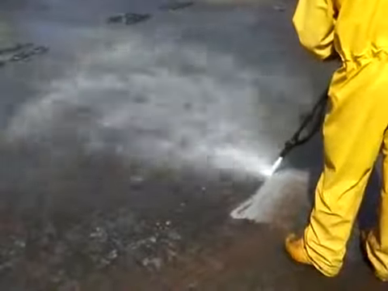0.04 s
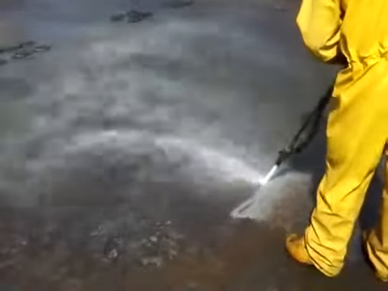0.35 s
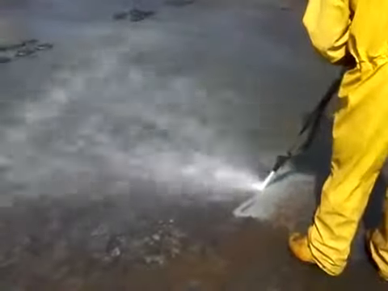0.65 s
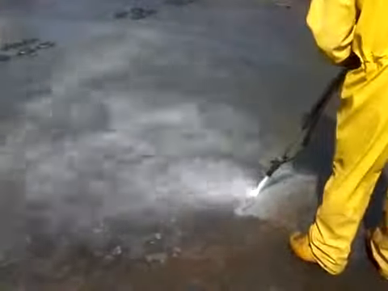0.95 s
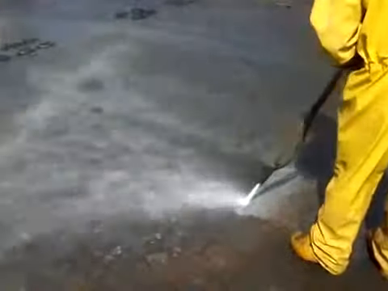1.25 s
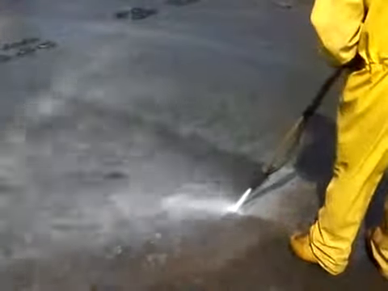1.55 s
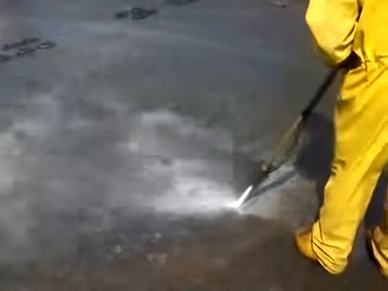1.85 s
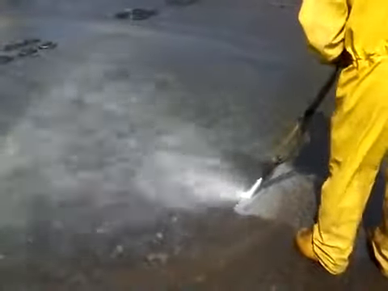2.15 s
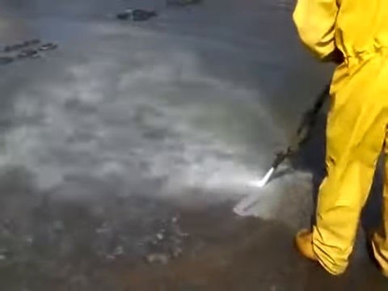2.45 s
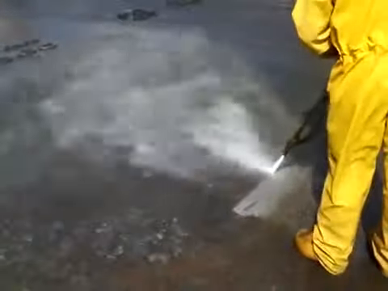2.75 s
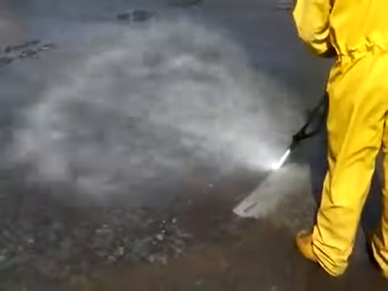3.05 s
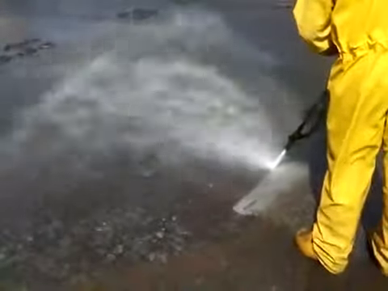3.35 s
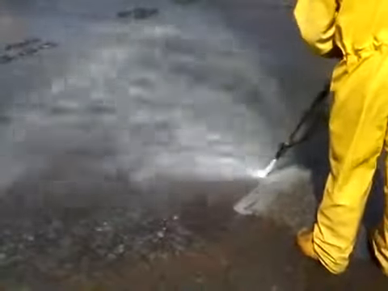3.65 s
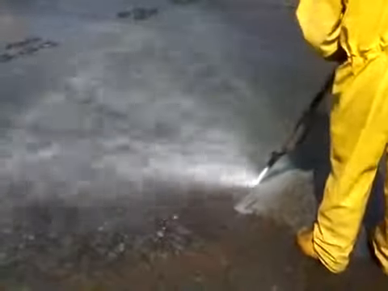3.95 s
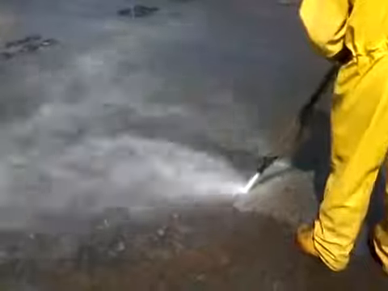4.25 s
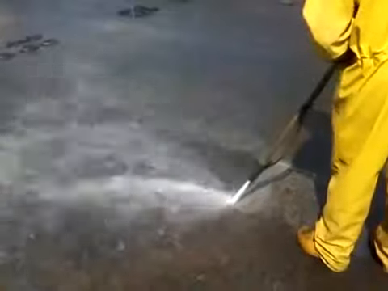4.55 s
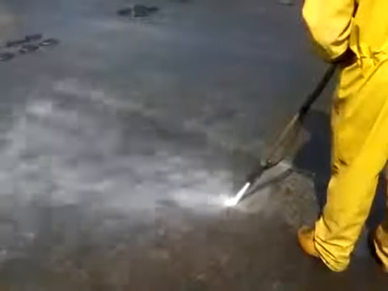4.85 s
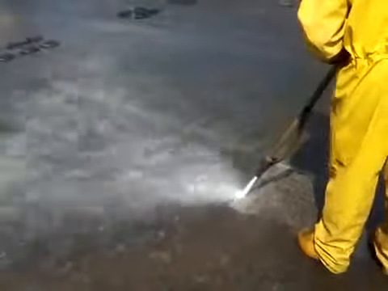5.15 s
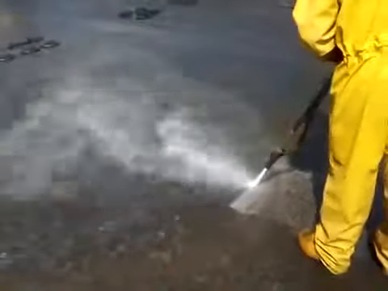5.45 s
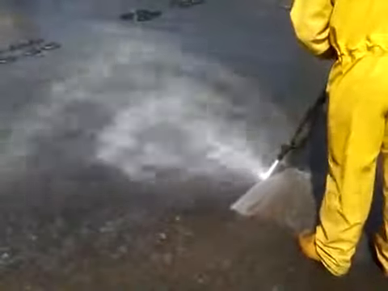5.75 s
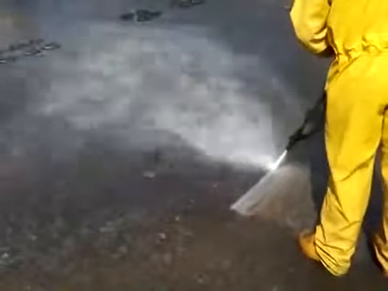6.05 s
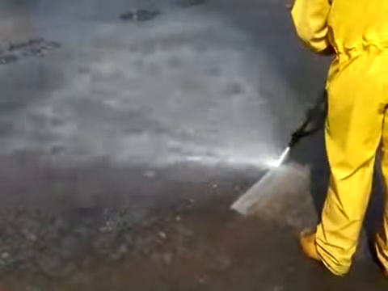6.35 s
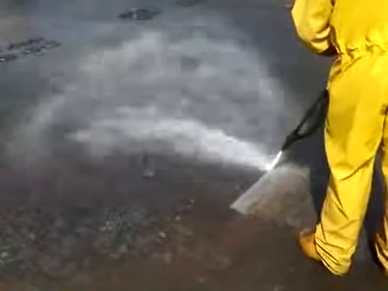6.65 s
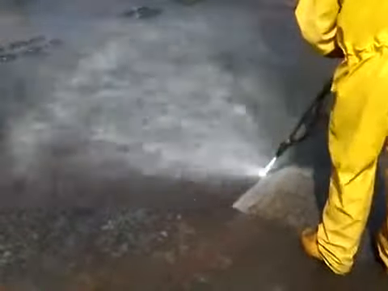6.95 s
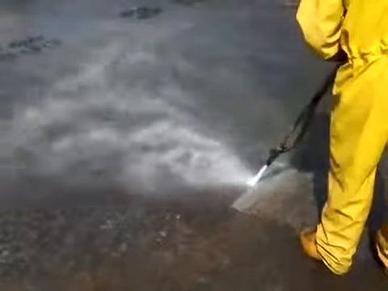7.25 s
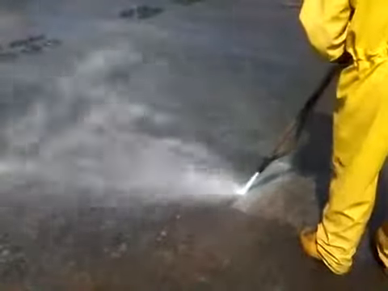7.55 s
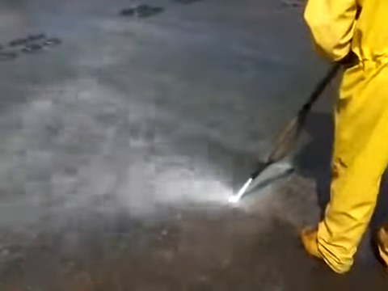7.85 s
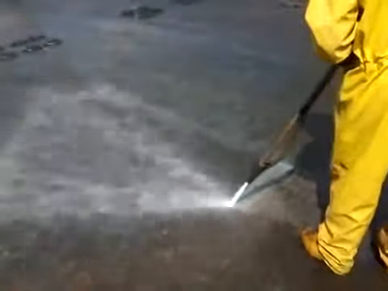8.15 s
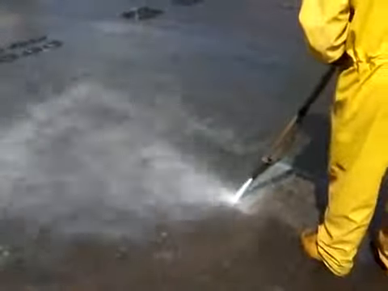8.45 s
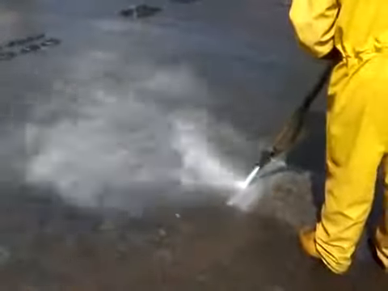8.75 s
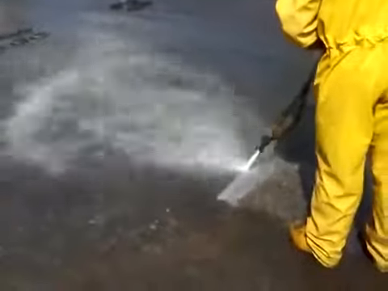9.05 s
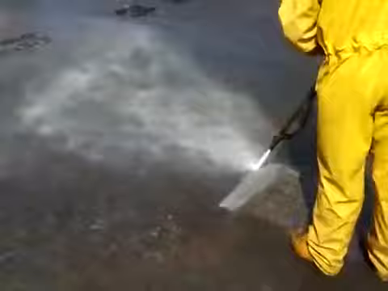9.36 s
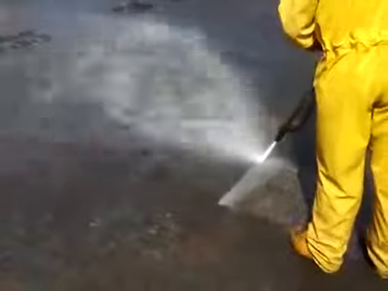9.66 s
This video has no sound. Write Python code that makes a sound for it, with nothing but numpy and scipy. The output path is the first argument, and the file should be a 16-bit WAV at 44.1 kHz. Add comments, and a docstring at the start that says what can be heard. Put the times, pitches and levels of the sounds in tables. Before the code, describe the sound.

A high-pressure jet of water and grit hisses loudly and without pause against flat ground outdoors. The bright hiss sputters slightly over a softer splashing wash, and its tone glides as the lance swings out and back about every three seconds. A few brief spits of grit break through. Underneath, a distant pump engine hums faintly and a light breeze rumbles on the microphone.

```python
"""Wet blasting outdoors

A worker sweeps a lance to and fro over flat ground; its sputtering jet of water and grit hisses.
Close reflections comb the hiss, and their notches glide as the lance swings out and back.
A pump engine hums far off and a breeze rumbles on the microphone. Mono, sampled at 16 kHz."""
import sys
import numpy as np
from scipy import signal
from scipy.fft import rfft, irfft, next_fast_len
from scipy.io import wavfile
from scipy.ndimage import uniform_filter1d, map_coordinates

SR = 44100
rng = np.random.default_rng(int(sys.argv[2]) if len(sys.argv) > 2 else 0)


def store_pcm(level_fs):
    """Save levels as 16-bit WAV."""
    pcm = np.round(np.clip(level_fs, -1, 1) * 32767).astype(np.int16)
    wavfile.write(sys.argv[1], SR, np.atleast_2d(pcm).T)


N = 432180
TIME_S = np.arange(N) / SR
SAMPLER_HZ = 16000


def amp(db):
    """Decibels to gain."""
    return 10 ** (np.asarray(db) / 20)


def unit_rms(x):
    """Scale to rms 1."""
    return x / np.sqrt(np.mean(x ** 2) + 1e-20)


def curve(rows):
    """One value per sample from (seconds, value) rows."""
    return np.interp(TIME_S, *np.transpose(rows))


def swells(rows):
    """Envelope of bell-shaped swells."""
    return sum(amp(db) * np.exp(-((TIME_S - peak_s) / width_s) ** 2) for peak_s, db, width_s in rows)


def wobble(rate_hz):
    """Smooth random curve, rate_hz knots a second."""
    knots = rng.standard_normal(int(N * rate_hz / SR) + 4)
    return map_coordinates(knots, [TIME_S * rate_hz])


def filtered(x, response):
    """Apply a gain given as a function of Hz."""
    size = next_fast_len(N + SR // 2)
    return irfft(rfft(x, size) * response(np.fft.rfftfreq(size, 1 / SR)), size)[:N]


def coloured(x, spectrum):
    """Shape x by (Hz, dB) rows, cut at half of SAMPLER_HZ; rms 1."""
    hz, db = np.transpose(spectrum)
    shaped = filtered(x, lambda f: amp(np.interp(np.log(f + 1), np.log(hz), db)) * (f < SAMPLER_HZ / 2))
    return unit_rms(shaped)


def turbulence(patchy_db):
    """White noise with brief random patches of gain in time and frequency; rms 1."""
    bins = signal.stft(rng.standard_normal(N), nperseg=256)[2]
    patches = uniform_filter1d(rng.standard_normal(bins.shape), size=9, axis=0)
    patches = unit_rms(uniform_filter1d(patches, size=12, axis=1))
    return unit_rms(signal.istft(bins * amp(patchy_db * patches), nperseg=256)[1][:N])


def impacts(per_s, spread_db):
    """Tiny impacts of uneven size at random moments; rms 1."""
    hits = rng.random(N) < per_s / SR
    return unit_rms(hits * rng.choice([-1, 1], N) * amp(spread_db * rng.standard_normal(N)))


# Wind rumble. Each row: time in seconds, level in dB.
RUMBLE_LEVELS = [(0, -42.7), (2.2, -43), (3, -45), (3.9, -44), (4.4, -39.8), (5.3, -41.8), (6.9, -42.2),
                 (9.3, -45), (9.8, -41.5)]
# Gusts. Each row: centre in seconds, peak level in dB, half-width in seconds.
GUST_THUMPS = [(4.36, -43, 0.042), (5.45, -36, 0.05), (5.92, -36.5, 0.026)]
# Rumble and thump spectra. Each row: frequency in Hz, relative density in dB.
RUMBLE_SPECTRUM = [(5, -5), (15, 3.5), (45, -2.5), (80, -7.5), (130, -14.5), (250, -25), (800, -60)]
THUMP_SPECTRUM = [(15, -8), (50, 6), (120, -3), (250, -13.5), (600, -45)]


def breeze():
    """Moving air buffets the microphone; a few gusts thump it."""
    rumble_db = curve(RUMBLE_LEVELS) + .98 * wobble(9)
    rumble = amp(rumble_db) * coloured(rng.standard_normal(N), RUMBLE_SPECTRUM)
    thumps = swells(GUST_THUMPS) * coloured(rng.standard_normal(N), THUMP_SPECTRUM)
    return rumble + thumps


# Engine tones. Each row: frequency in Hz, mean amplitude in dB.
ENGINE_TONES = [(45.3, -56.5), (145, -60), (193.3, -66.5), (290, -60.5), (380, -61), (580, -65.5),
                (760, -62.5)]
# Engine drone. Each row: frequency in Hz, relative density in dB.
DRONE_SPECTRUM = [(40, -23), (100, -13.5), (145, 0.5), (215, -3), (245, 1.5), (300, 1.5), (345, -6.5),
                  (480, -10), (800, -19.5), (2000, -26.5)]


def pump_engine():
    """A distant engine turns slightly unevenly: wavering tones over a low drone."""
    engine_time_s = np.cumsum(1 + .001 * wobble(2.5)) / SR
    tones = np.zeros(N)
    for hz, db in ENGINE_TONES:
        tones += amp(db + 1.8 * wobble(3)) * np.sin(2 * np.pi * (hz * engine_time_s + rng.random()))
    drone = amp(-51) * coloured(rng.standard_normal(N), DRONE_SPECTRUM)
    return tones + drone


# Ends of the strokes. Each row: time in seconds, reach from 0 (at the boots) to 1 (far out).
LANCE_TURNS = [(-.4, .055), (1.8, .85), (3.12, .1), (4.84, .91), (6.35, .13), (8.23, 0.97), (9.8, .16)]


def lance_reach(linger=1.75):
    """The lance eases from turn to turn; linger above 1 dwells near the boots and turns briskly far out."""
    turn_s, reach = np.transpose(LANCE_TURNS)
    turns = np.arange(len(turn_s))
    stroke = np.interp(TIME_S, turn_s, turns)
    eased = np.floor(stroke) + np.sin(np.pi / 2 * (stroke % 1)) ** 2
    return np.interp(eased, turns, reach ** (1 / linger)) ** linger


def suit_paths(count):
    """Weak later reflections off folds of the worker's suit, as rows like CLOSE_PATHS."""
    near_ms = rng.uniform(1.9, 2.8, count)
    far_ms = near_ms + rng.uniform(.9, 1.4, count)
    gain = .05 * rng.choice([-1, 1], count)
    return list(zip(near_ms, far_ms, gain, gain))


# Reflections, lance near and far. Each row: near delay in ms, far delay in ms, near gain, far gain.
CLOSE_PATHS = [(.127, .591, -.25, -.075), (.221, .696, -.055, -.1), (.333, 1.081, .11, .075),
               (.341, .303, .188, .083), (.442, .404, .125, .073), (.515, 1.201, -.075, -.08),
               (.549, .527, .101, .132), (.734, 1.435, -.09, -.035), (.751, .691, -.081, -0.064),
               (.762, 1.098, -.075, .05), (1.261, 1.194, -.065, -.05), (1.65, 1.65, .075, .075),
               (1.925, 1.9, .06, .01)]


def add_reflections(direct, reach, corner_hz=1000):
    """Small surfaces throw back only short waves; the delays shift with reach, so the notches glide."""
    treble = filtered(direct, lambda f: f ** 4 / (f ** 4 + corner_hz ** 4))
    heard = direct.copy()
    for near_ms, far_ms, near_gain, far_gain in CLOSE_PATHS + suit_paths(count=4):
        delay_samples = (near_ms + (far_ms - near_ms) * reach) * SR / 1000
        gain = near_gain + (far_gain - near_gain) * reach
        heard += gain * map_coordinates(treble, [np.arange(N) - delay_samples])
    return heard


# Drift of the wash against the jet. Each row: time in seconds, offset in dB.
WASH_DRIFT = [(0, .5), (6.3, -.6), (6.7, .6), (9, 0), (9.8, 1.8)]
# Splashing water. Each row: frequency in Hz, relative density in dB.
WASH_SPECTRUM = [(200, -22), (480, -11.5), (650, -6.5), (900, -6.8), (1550, -3), (1850, 0), (2600, -0.7),
                 (4000, -8.5), (8000, -28)]


def spray_wash(reach, feed_db, sputter_db):
    """Spray and drops wash over the ground, a little softer far out."""
    drops = .5 * impacts(per_s=900, spread_db=3.5)
    level_db = -40.6 - 1.4 * reach + feed_db + curve(WASH_DRIFT) + .65 * sputter_db
    return amp(level_db) * coloured(turbulence(patchy_db=1.13) + drops, WASH_SPECTRUM)


# Grit clumps. Each row: centre in seconds, peak level in dB, half-width in seconds.
GRIT_CLUMPS = [(1.94, -34.5, .022), (2.65, -39, .02), (3.06, -33, .023), (7.48, -33, .015),
               (8.79, -31, .02)]
# Spit of a clump. Each row: frequency in Hz, relative density in dB.
SPIT_SPECTRUM = [(600, -26), (1300, -6.5), (2500, 3), (4500, 1.5), (8000, -10)]


def grit_spits():
    """Clumps of grit spit from the nozzle in dense bursts of impacts."""
    return swells(GRIT_CLUMPS) * coloured(impacts(per_s=4000, spread_db=3), SPIT_SPECTRUM)


# Jet hiss. Each row: frequency in Hz, relative density in dB.
HISS_SPECTRUM = [(300, -52), (900, -23), (1600, -21), (2400, -16.5), (3000, -10), (3700, -6), (4500, -3.5),
                 (5500, -1.55), (6500, -1), (7200, .3), (8000, 2.4)]


def jet_hiss(reach, feed_db, sputter_db):
    """The turbulent jet hisses and grit peppers the ground, a little softer far out."""
    grit = .39 * impacts(per_s=2500, spread_db=4)
    level_db = -24 - 1.6 * reach + feed_db + sputter_db
    return amp(level_db) * coloured(turbulence(patchy_db=.8) + grit, HISS_SPECTRUM)


# Slow drift in jet strength. Each row: time in seconds, offset in dB.
FEED_DRIFT = [(0, .1), (2, .2), (2.8, -.6), (3.3, 1), (4, -.3), (4.6, .5), (5.35, -.9), (6.6, .2),
              (8.3, .2), (9.25, -.6), (9.8, .4)]


def blasting_lance():
    """The swinging jet and its reflections; uneven grit feed makes hiss and wash sputter together."""
    reach, feed_db = lance_reach(), curve(FEED_DRIFT)
    sputter_db = .3 * wobble(16) + .51 * wobble(28) + .7 * wobble(85)
    hiss = jet_hiss(reach, feed_db, sputter_db)
    wash = spray_wash(reach, feed_db, sputter_db)
    return add_reflections(hiss + wash + grit_spits(), reach)


def scene():
    """Lance, engine and breeze at one microphone, the same in both channels."""
    mono = blasting_lance() + pump_engine() + breeze()
    return np.array([mono, mono])


def record(dry):
    """Coarse sampling mirrors the treble about half its rate; a soft low-pass fades the mirror image."""
    skirt_hz, top_hz = 610, 10740
    mirrored = dry[0] * (1 + 2 * np.cos(2 * np.pi * SAMPLER_HZ * TIME_S))
    smoothed = filtered(mirrored, lambda f: (f < top_hz) / (1 + np.exp((f - SAMPLER_HZ / 2) / skirt_hz)))
    return np.array([smoothed, smoothed])


dry = scene()
out = record(dry)
store_pcm(out)
```